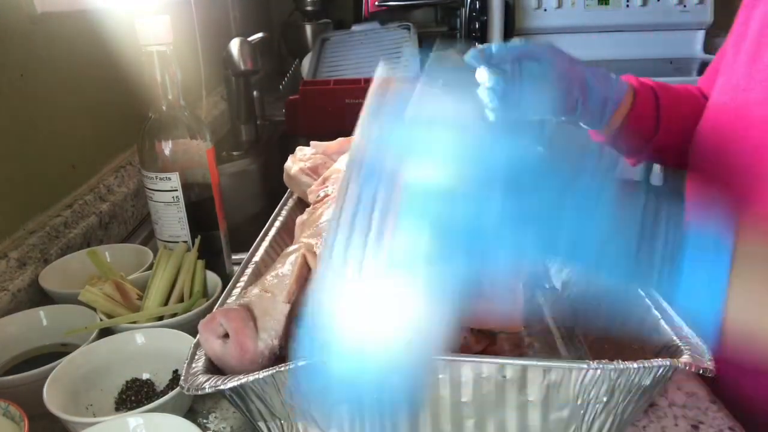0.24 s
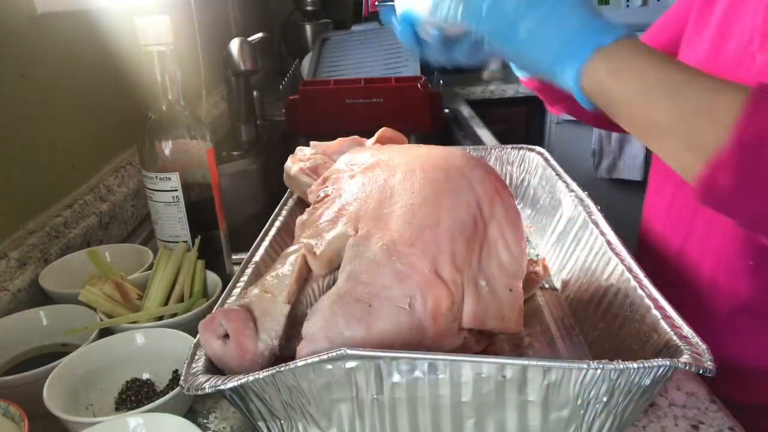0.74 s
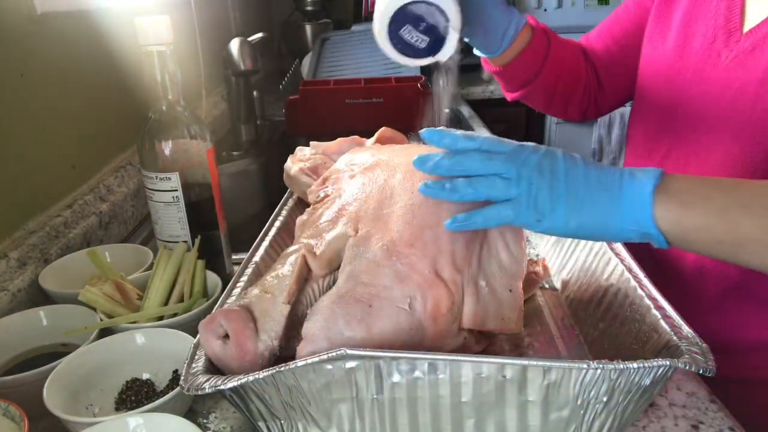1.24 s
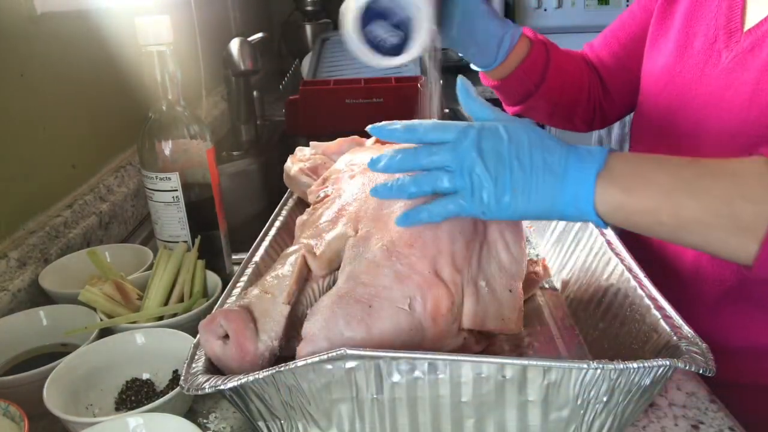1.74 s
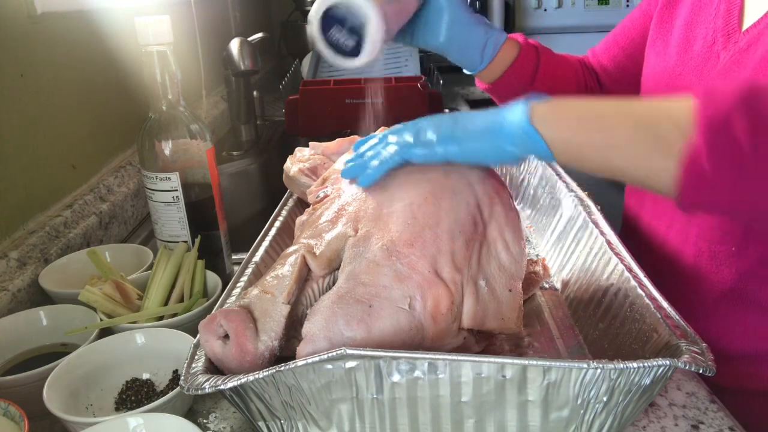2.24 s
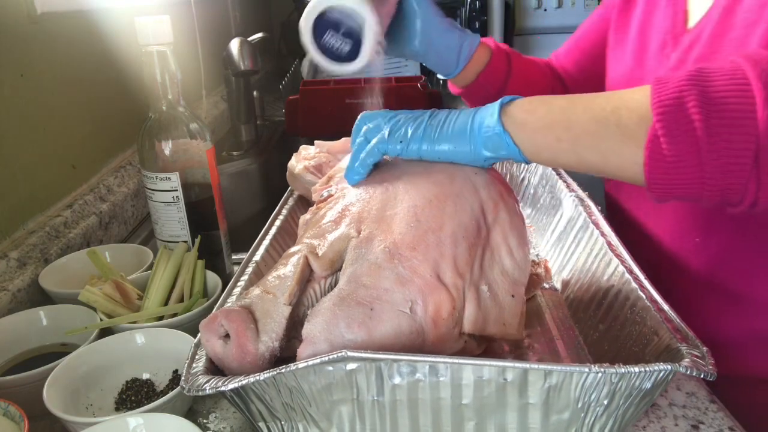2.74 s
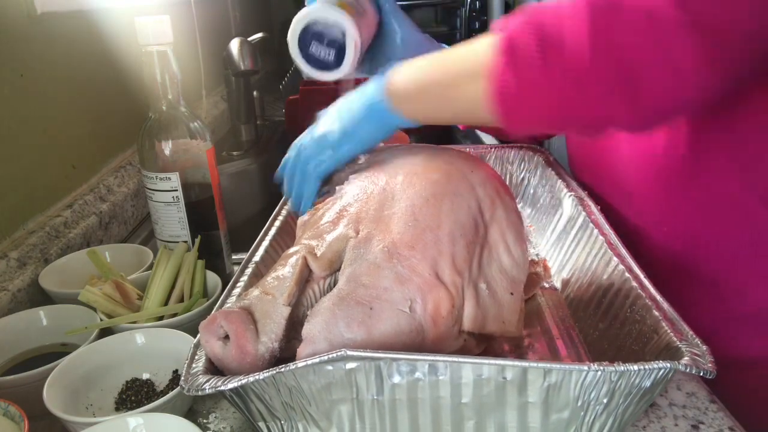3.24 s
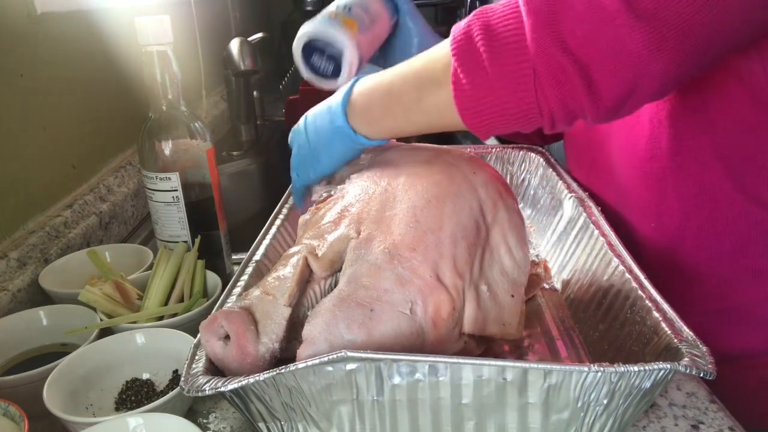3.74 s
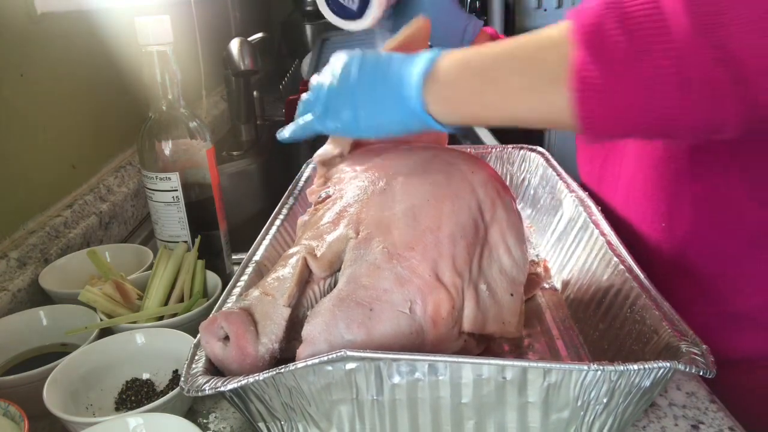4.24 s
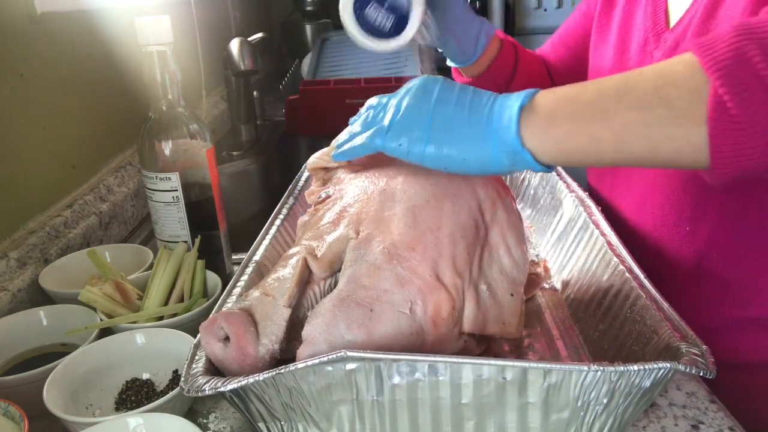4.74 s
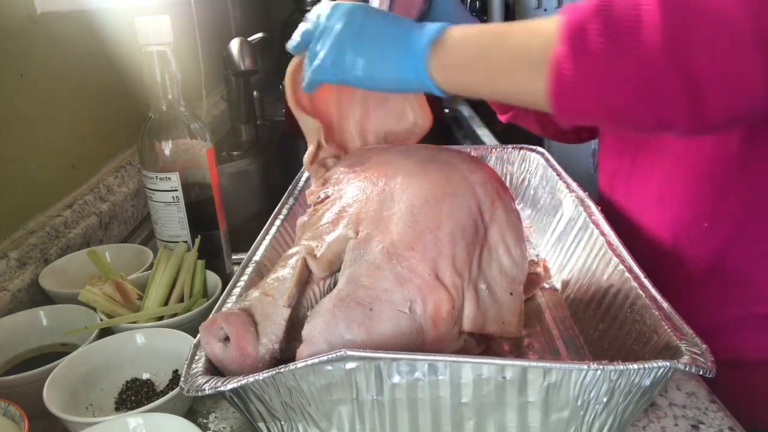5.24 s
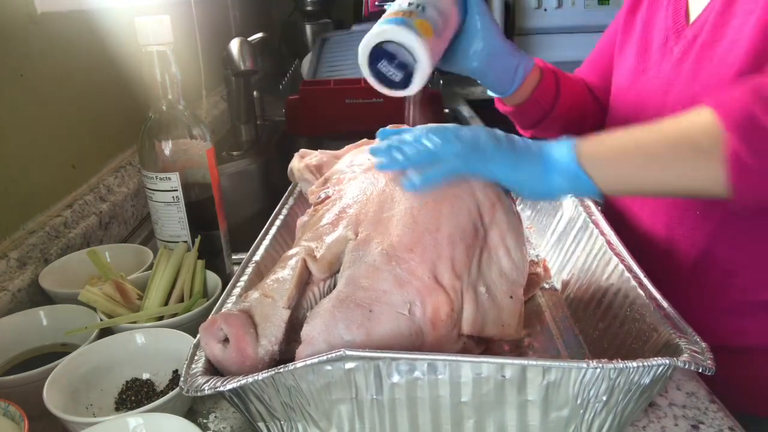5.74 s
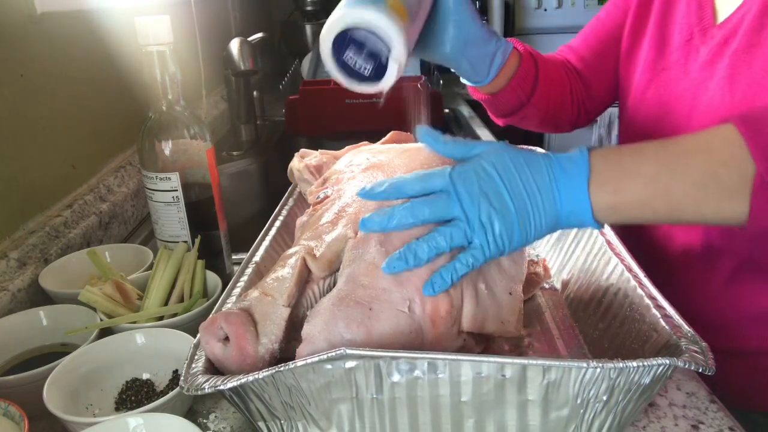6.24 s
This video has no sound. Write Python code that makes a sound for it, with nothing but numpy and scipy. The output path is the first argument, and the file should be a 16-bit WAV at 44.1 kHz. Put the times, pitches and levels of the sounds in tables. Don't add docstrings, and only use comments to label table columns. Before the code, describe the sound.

Close crisp hiss of salt grains ticking on foil and scraping under a rubber glove, broken by hard knocks and a heavy slap.

```python
import sys
import numpy as np
from scipy import signal
from scipy.fft import rfft, irfft
from scipy.io import wavfile
from scipy.ndimage import uniform_filter1d

SR = 44100
rng = np.random.default_rng(int(sys.argv[2]) if len(sys.argv) > 2 else 0)


def generate_wav(signal):
    frames = np.transpose(np.atleast_2d(signal))
    scaled = np.clip(frames, -1, 1) * 32767
    pcm = np.round(scaled).astype(np.int16)
    wavfile.write(sys.argv[1], SR, pcm)


def elevation(decibels):
    levels = np.asarray(decibels, float)
    return 10 ** (levels / 20)


N = 285327

# start [s], peak level [dB], fade t60 [s].
SHOWERS = [(1.314, -17, 0.04), (1.3453, -13, 0.049), (1.446, -15, 0.039), (1.4582, -15, .04),
           (1.592, -17, 0.039), (1.6823, -10, 0.077), (1.7772, -15, .083), (1.8504, -13, 0.061),
           (2.0092, -14, 0.034), (2.0449, -18, 0.049), (2.28, -14, .025), (2.348, -18, 0.052),
           (2.463, -20, .031), (3.326, -22, .032), (3.3914, -21, .04), (3.5405, -19, .04),
           (3.601, -16, 0.031), (4.0167, -24.5, .034), (4.0652, -19, .021), (4.102, -12.5, 0.051),
           (4.2825, -15.5, 0.027), (4.5097, -20, 0.04), (4.551, -20, 0.047), (4.68, -18.5, .035),
           (4.7068, -18, .03), (4.864, -18, 0.033), (4.9637, -20, 0.048), (4.9897, -17, 0.045),
           (5.107, -15, 0.068), (5.3344, -15, .04)]
# start [s], ring level [dB], fade t60 [s], glint [Hz].
LUMPS = [(.8955, -36, .047, 6730), (1.3781, -26, .04, 5700), (1.48, -26.5, 0.035, 3400),
         (1.515, -24.5, 0.058, 3300), (1.64, -31, 0.026, 5530), (1.659, -35, 0.033, 6300),
         (1.7276, -29, 0.043, 5820), (1.8304, -28, 0.057, 3460), (1.9392, -38, .03, 5720),
         (1.9626, -33.5, 0.028, 6080), (2.1713, -29, 0.034, 4340), (2.318, -32, 0.063, 2400),
         (3.3544, -40, .034, 2660), (3.439, -29.5, 0.055, 6060), (3.4655, -33, .043, 6060),
         (3.9228, -36, 0.033, 2700), (3.9606, -34.5, 0.077, 3820), (4.128, -32.5, 0.074, 6870),
         (4.3096, -35, .034, 3900), (4.588, -37, .04, 4570), (4.613, -34, .046, 5170),
         (4.7296, -29, 0.024, 4470), (4.8525, -36.5, 0.043, 4950), (5.066, -30, 0.04, 2710),
         (5.242, -34, .049, 5780), (5.5852, -29, 0.033, 2700), (5.7378, -34, 0.014, 6250),
         (6.0568, -26.5, 0.04, 6440), (6.0843, -25.5, 0.028, 3700), (6.3606, -31, 0.034, 5300)]
# start [s], ring level [dB], glint [Hz].
CREASES = [(0.223, -37, 5850), (.446, -38, 2670), (.4685, -40.5, 4450), (0.714, -32.5, 4360),
           (1.6249, -40, 2430), (1.991, -36, 5570), (2.7883, -36, 4100), (2.878, -35.5, 2600),
           (3.9468, -36, 2000), (4.2367, -31, 6440), (4.247, -29, 3820), (4.795, -32, 2000),
           (4.9028, -30, 5200), (4.925, -37, 3200), (5.014, -31, 2580), (5.3555, -25.5, 5260),
           (5.958, -29, 5700), (5.987, -33, 5700), (6.0413, -28, 4000), (6.135, -41, 2580),
           (6.156, -28.5, 3720), (6.171, -35, 5040), (6.074, -27, 3300), (6.108, -29.5, 3800),
           (6.2378, -33.5, 3770), (6.3317, -23, 3600), (6.385, -35, 3490)]


def unit(x):
    return x / np.sqrt(np.mean(x ** 2))


def on_curve(points, hz):
    f, value = np.transpose(points)
    return np.interp(np.log(np.maximum(hz, 1)), np.log(f), value)


def colour(x, points):
    gain = elevation(on_curve(points, np.fft.rfftfreq(4096, 1 / SR)))
    cepstrum = irfft(np.log(gain))
    cepstrum[1:2048] *= 2
    cepstrum[2049:] = 0
    impulse = irfft(np.exp(rfft(cepstrum)))
    return signal.fftconvolve(x, impulse)[:len(x)]


def resonance(x, hz, width):
    return signal.lfilter(*signal.iirpeak(hz, hz / width, fs=SR), x)


def resonance_twice(x, hz, width):
    return resonance(resonance(x, hz, width), hz, width)


def die_away(t, t60):
    return np.exp(-np.log(1000) * t / t60)


def walk(rate):
    hold = int(SR / rate)
    steps = np.repeat(rng.standard_normal(N // hold + 1), hold)
    smooth = uniform_filter1d(uniform_filter1d(steps, hold), hold)
    return unit(smooth[:N])


def swells(steady_db, rows):
    t = np.arange(N) / SR
    power = elevation(2 * steady_db)
    for peak, half, db in rows:
        power = power + elevation(2 * db) * np.exp(-((t - peak) / half) ** 2)
    return np.sqrt(power)


def knocks():
    # start [s], ring level [dB], rattle level [dB], rattle decay stretch [x], rise [s].
    blows = [
        (.0, -17.5, -24, 1., 0.00073),
        (0.492, -40, -39.5, 0.25, 0.00043),
        (2.5403, -11.5, -22, 0.98, 0.0018),
        (5.4775, -10.5, -16, 0.78, 0.0089),
    ]
    # frequency [Hz], level [dB], t60 [s].
    blow_modes = [
        [(64.6, -9, 0.14), (357, -5.5, 0.16), (508, -8.5, 0.25), (637, 2.5, 0.26), (1100, -20, 0.27),
         (1430, -33, 0.68)],
        [(200, -2, .05), (450, 0, 0.045), (980, 6, .045), (2700, 2, .04)],
        [(115, -8.5, 0.12), (204, -6, 0.17), (338, -8.5, 0.24), (408, -1, 0.066), (456, -5.5, 0.17),
         (1083, -8.5, 0.14), (1275, -13, .15), (1463, 6, 0.041), (1415, -19, .3), (1810, -25, 0.22),
         (2000, -10, 0.091), (2320, -9.5, 0.1), (3010, -12, 0.082), (4140, -15, 0.057), (6600, -15, .05)],
        [(92, -10, 0.21), (163, 0, 0.23), (215.3, -5, 0.2), (330.7, 1.5, 0.22), (389, 6.5, 0.12),
         (419, -6, 0.25), (1008, 1, 0.054), (688, 9.5, 0.052), (798, -4.5, 0.18), (903, -11, 0.13),
         (1300, -12, 0.14), (1470, -4, 0.05), (1793, 2.5, 0.067), (2000, 1, 0.039), (2700, -11.5, .07)],
    ]
    # frequency [Hz], level [dB per Hz].
    rattle_spectra = [
        [(35, -41), (60, 0), (236, -8), (642, -4), (857, -18), (1240, -9), (1820, -26), (6000, -38),
         (7800, -77), (13200, -120)],
        [(90, -25), (200, 4), (1020, -5.5), (2080, -16), (2780, -10), (5010, -17), (8000, -7), (10400, -41),
         (17600, -120)],
        [(35, -35), (60, 2), (364, 0), (860, -16.5), (1390, -1.5), (1720, -7.5), (2070, -7), (3970, -15.5),
         (5560, -15.5), (9000, -64), (11700, -72), (19800, -120)],
        [(29, -41), (50, 8), (385, 6), (546, -1), (1020, -3.5), (1450, 0.5), (2050, -17), (3610, -9),
         (5010, -30), (9000, -61), (11700, -63), (19800, -120)],
    ]
    # frequency [Hz], t60 [s].
    rattle_t60 = [(60, 0.34), (300, 0.27), (900, 0.37), (2000, 0.23), (4000, 0.087), (9000, 0.032)]
    out = np.zeros(N + SR)
    t = np.arange(SR // 2) / SR
    for blow, modes, spectrum in zip(blows, blow_modes, rattle_spectra):
        start, ring_db, rattle_db, stretch, rise = blow
        ring = 0
        for hz, db, t60 in modes:
            ring = ring + elevation(db) * np.sin(2 * np.pi * hz * t) * die_away(t, min(t60, .45))
        rattle = 0
        for hz in 80 * 2 ** np.arange(0, 7, .5):
            band = unit(resonance_twice(rng.standard_normal(len(t)), hz, hz / 1.85))
            crack = 1.19 * np.exp(-t / 0.01)
            fade = die_away(t, stretch * on_curve(rattle_t60, hz)) + crack
            onset = np.minimum((t + .0001) * hz / 3.4, 1)
            rattle = rattle + elevation(on_curve(spectrum, hz)) * np.sqrt(hz / 300) * band * fade * onset
        landing = np.minimum(t / rise, 1) ** 2
        i = int(start * SR)
        out[i:i + len(t)] += (elevation(ring_db) * ring + elevation(rattle_db - 6.5) * rattle) * landing
    return out[:N]


def kitchen():
    # frequency [Hz], level [dB per Hz].
    air_spectrum = [(15, -11), (25, -0.5), (145, -6), (335, -10.5), (451, -16), (575, -14), (818, -22.5),
                    (911, -21), (1230, -20.5), (1740, -23), (2050, -25.5), (4250, -29.5), (16000, -34)]
    # steady level [dB], then swells, each with peak [s], half length [s], level [dB].
    rumble_levels = (-54, [(0.01, 0.5, -32.5), (2.72, 0.17, -38), (3.5, 0.074, -39), (4.1, 0.34, -42)])
    # tone [Hz], steady level [dB], swells, each with peak [s], half length [s], level [dB].
    appliance_tones = [
        (52.3, -60, [(.6, 1, -48), (2.62, 0.26, -42)]),
        (90.7, -63.5, [(.45, 0.27, -48), (3.1, 1.6, -52.5)]),
        (141.5, -68, [(.35, 0.34, -41), (2.1, 0.28, -50.5), (3.9, 0.72, -51), (5.64, 0.33, -53.5)]),
        (168.6, -59, [(5.2, .5, -54.5)]),
        (196.6, -55, [(5.64, 0.29, -56.5)]),
        (272, -73, [(.1, 0.37, -55), (2.05, 0.2, -54), (4.1, .5, -64.5)]),
    ]
    air_db = -46 + .8 * walk(6)
    air = elevation(air_db) * unit(colour(rng.standard_normal(N), air_spectrum))
    low_noise = unit(resonance_twice(rng.standard_normal(N), 57, 90))
    rumble = swells(*rumble_levels) * elevation(-10.0 + 2.3 * walk(4.58)) * low_noise
    hum = 0
    for hz, steady_db, rows in appliance_tones:
        wavering_hz = hz * (1 + 0.006 * walk(8))
        phase = 2 * np.pi * np.cumsum(wavering_hz) / SR
        hum = hum + swells(steady_db, rows) * elevation(2.5 + 2.2 * walk(11)) * np.sin(phase)
    return air + rumble + hum


def bursts():
    # start [s], bright level [dB], ring level [dB], t60 [s], glint [Hz].
    clatter = (0.001, -26, -38, .075, 1500)
    # start [s], bright level [dB], ring level [dB], t60 [s], glint [Hz].
    buckle = (5.4836, -31, -18, .026, 1940)
    rows = [clatter, buckle]
    for start, db, t60 in SHOWERS:
        patch_hz = rng.uniform(2530, 6960)
        rows.append((start, db, db - 18.5, t60, patch_hz))
    for start, db, t60, hz in LUMPS:
        rows.append((start, db + 13.5, db, t60, hz))
    for start, db, hz in CREASES:
        rows.append((start, db + 9, db, 0.034, hz))
    return rows


def showers():
    power, glint = np.zeros((3, N)), np.zeros(N)
    for start, bright_db, ring_db, t60, hz in bursts():
        i = int(start * SR)
        t = np.arange(min(N - i, SR // 5)) / SR
        rise = 0.0011 * (t60 / 0.044) ** 2
        shape = np.minimum(t / rise, 1) * die_away(np.maximum(t - rise, 0), t60)
        layer_db = np.array([[bright_db - 13.0], [ring_db - 3.0], [ring_db - 20]])
        power[:, i:i + len(t)] += (elevation(layer_db) * shape) ** 2
        tone = np.sin(2 * np.pi * (hz * t + rng.random()))
        glint[i:i + len(t)] += elevation(ring_db - 2.5) * shape ** 1.23 * tone
    return power, glint


def puffs(rows, sharpness, trim_db, rise_s):
    out, t = np.zeros(N + SR), np.arange(SR // 10) / SR
    for start, db, hz, t60 in rows:
        i = int(start * SR)
        puff = unit(resonance(rng.standard_normal(len(t)), hz, hz / sharpness))
        shape = np.minimum(t / rise_s, 1) * die_away(t, t60)
        out[i:i + len(t)] += elevation(db + trim_db) * puff * shape
    return out[:N]


def coarse_grains():
    # start [s], peak level [dB], centre [Hz], t60 [s].
    landing = [(0.1134, -38, 5330, 0.015), (0.2014, -27, 6690, 0.015), (0.2239, -20.5, 5680, 0.015),
               (0.6784, -27, 6170, 0.015), (0.7384, -34, 11160, 0.015), (1.3139, -23, 12500, 0.015),
               (1.3458, -18, 13500, 0.012), (1.4134, -21, 6170, 0.015), (1.4254, -21, 12800, 0.015),
               (1.4654, -13, 14000, 0.015), (1.4854, -16, 7130, 0.015), (1.5044, -21, 8040, 0.015),
               (1.515, -15, 9550, 0.015), (1.9054, -29, 7420, 0.015), (1.9395, -22, 12800, 0.015),
               (1.9624, -22, 13900, 0.015), (1.9704, -20, 6300, 0.015), (2.0044, -22, 13400, 0.015),
               (2.0083, -23, 13000, 0.015), (2.0534, -16, 11500, 0.015), (2.0694, -23, 11400, 0.015),
               (2.8964, -29, 13600, 0.015), (4.0554, -25, 4340, 0.015), (4.0647, -23, 11500, 0.015),
               (4.1021, -20, 11300, 0.015), (4.1354, -23, 5370, 0.015), (4.2098, -20, 6200, 0.017),
               (4.2817, -15, 12400, 0.015), (4.3091, -20, 3900, 0.015), (4.3264, -21, 11600, 0.015),
               (4.3444, -21, 12400, 0.015), (4.372, -25, 12000, 0.015), (4.6798, -18, 13000, 0.015),
               (4.7296, -14.5, 11900, 0.016), (5.9579, -17, 5700, 0.015), (5.9964, -20, 4340, 0.015),
               (6.0064, -23, 13100, 0.015), (6.1564, -19, 11600, 0.014), (6.2377, -29, 3700, 0.015),
               (6.2821, -26, 11900, 0.015), (6.332, -23, 4080, 0.015), (6.3534, -19, 5380, 0.017)]
    # start [s], peak level [dB], centre [Hz], t60 [s].
    bouncing = [(0.7138, -26, 4360, 0.018), (2.0448, -22, 11500, 0.018), (4.808, -24, 11400, 0.018),
                (4.864, -23, 13300, 0.018), (4.8774, -33, 13300, 0.018), (4.8927, -24, 5460, 0.018),
                (4.9252, -23, 13500, 0.018), (4.9382, -26, 11600, 0.018), (4.9494, -26, 11000, 0.018),
                (5.1324, -20, 12300, 0.014), (5.5654, -15, 11400, 0.018), (5.6254, -23, 3750, 0.018)]
    return puffs(landing + bouncing, 1.2, -10, 0.00022)


def gesture(full, swell, hold, db, sag_db_per_s):
    t = np.arange(N) / SR - full
    swell_db = -11.5 * (-t / swell).clip(0)
    sag_db = -sag_db_per_s * t.clip(0)
    release_db = -356 * ((t - hold).clip(0) + (-swell - t).clip(0))
    return elevation(2 * (db + swell_db + sag_db + release_db))


def hands():
    # full pressure at [s], swell [s], hold [s], level [dB].
    strokes = [(0.19, 0.16, 0.041, -53), (0.452, .007, .043, -46.5), (0.585, .025, 0.011, -43),
               (0.678, 0.065, 0.047, -43.5), (1.098, .075, .005, -50), (1.13, .03, 0.1, -50),
               (1.326, 0.0064, 0.11, -39), (1.588, 0.32, 0.28, -41), (1.926, 0.071, .02, -44),
               (2.184, 0.26, 0.34, -39), (2.65, 0.19, 0.45, -51.5), (2.992, 0.079, .01, -46.5),
               (3.42, 0.048, 0.11, -44), (3.603, 0.27, 0.24, -42), (4.05, 0.37, .01, -51),
               (4.077, 0.0072, 0.24, -42), (4.54, 0.61, 0.089, -43), (4.68, 0.015, 0.12, -43.5),
               (4.9, 0.095, .05, -49), (4.97, .012, 0.19, -39.5), (5.106, 0.22, 0.21, -40.5),
               (5.37, 0.32, 0.47, -35.5), (6.05, 0.93, 0.14, -44.5), (6.22, .05, 0.28, -52.5)]
    # full flow at [s], swell [s], hold [s], level [dB], lumpiness [0 to 1].
    pours = [(0.21, 0.063, 0.17, -49.5, 0.29), (0.469, 0.021, 0.013, -38, 0.69),
             (0.864, 0.3, .02, -38.5, 0.12), (0.922, 0.054, 0.077, -27.5, 0.051),
             (1.053, 0.1, 0.028, -26, .12), (1.11, 0.047, .11, -35, 0.29), (1.32, .004, 0.17, -34.5, 0.29),
             (1.503, .16, 0.042, -36, 0.51), (1.84, 0.6, 0.048, -34, 0.57), (1.94, .01, 0.44, -37.5, 0.36),
             (2.33, .34, 0.14, -38.5, 0.34), (3.001, 0.03, 0.013, -44, 0.63), (3.34, 0.27, .02, -52, 0.53),
             (3.396, 0.059, 0.14, -36.5, .35), (3.588, .19, 0.26, -35.5, 0.44),
             (4.055, .25, .02, -50, 0.47), (4.1, 0.027, 0.24, -38.5, 0.53),
             (4.435, 0.51, 0.24, -38.5, 0.35), (4.69, .015, 0.13, -42, 0.31),
             (4.962, 0.12, 0.12, -38, 0.31), (5.118, .18, 0.25, -46, 0.27),
             (5.324, 0.39, 0.51, -29.5, 0.49), (6.05, 0.27, 0.089, -35, 0.52),
             (6.332, 0.18, 0.17, -41, 0.54)]
    tipped_s, tip_db_per_s = 0.68, 30
    before_tip = (tipped_s - np.arange(N) / SR).clip(0)
    trickle = elevation(2 * (-52 - tip_db_per_s * before_tip))
    bright, ring, lumps = trickle, trickle, 0.28 * trickle
    for full, swell, hold, db, lumpy in pours:
        power = gesture(full, swell, hold, db, 20.5)
        bright = bright + power
        lumps = lumps + power * lumpy
        ring = ring + power * elevation(2 * (-11.5 + 18 * lumpy))
    rub = elevation(2 * -59)
    for full, swell, hold, db in strokes:
        rub = rub + gesture(full, swell, hold, db, 19.5)
    ring = ring + rub * elevation(2 * -2.5)
    return (bright, ring, rub), (lumps / bright).clip(0, 1)


def lulls():
    # end [s], length [s], level change [dB].
    pauses = [(0.167, .12, -3), (1.32, 0.079, -8.5), (1.341, 0.013, -6), (1.445, .012, -4),
              (1.624, 0.022, -5), (1.656, 0.0088, -5), (1.71, .012, -5.5), (1.774, 0.028, -3.5),
              (1.937, 0.013, -4), (1.963, .012, -8), (2.46, 0.032, -3.5), (3.118, 0.091, -4),
              (3.352, .016, -4.5), (3.43, 0.018, -4), (4.06, 0.018, -9), (4.281, 0.022, -3),
              (4.5, 0.022, -6), (4.587, .01, -8), (4.68, .035, -3), (4.698, .008, -6), (4.757, .015, -6),
              (5.955, 0.0094, -4), (6.247, .04, -5.5), (6.278, 0.036, -3)]
    depth, length_s = 0.22, 0.026
    gain = np.ones(N)
    to_burst = np.arange(SR // 20)[::-1] / SR
    for start, *_ in SHOWERS + LUMPS + CREASES:
        i = int(start * SR)
        gain[i - len(to_burst):i] *= 1 - depth * np.exp(-to_burst / length_s)
    for end, length, db in pauses:
        first, last = int((end - length) * SR), int(end * SR)
        ramp = np.minimum(np.linspace(0, 3, last - first), 1)
        gain[first:last] *= elevation(2 * db * ramp)
    return gain


def grains(per_s, spread_db):
    hit = rng.random(N) < per_s / SR
    size = elevation(spread_db * rng.exponential(size=N))
    return unit(hit * rng.standard_normal(N) * size)


def spurts(per_s, spread_db, fade_s):
    tail = np.exp(-np.arange(int(8 * fade_s * SR)) / (fade_s * SR))
    power = signal.fftconvolve(grains(per_s, spread_db) ** 2, tail)[:N].clip(0)
    return 8.0 * np.tanh(power / power.mean() / 3.1)


def salt():
    # frequency [Hz], level [dB per Hz].
    bright_spectrum = [(5000, -20), (8000, -3.5), (9300, -1), (10300, -4), (11100, 1), (12600, 2.5),
                       (14600, -3.5), (16500, -9.5)]
    # frequency [Hz], level [dB per Hz].
    ring_spectrum = [(1500, -19), (2600, -5), (3400, 0), (4900, -2), (5700, -2.5), (8000, -0.5),
                     (14000, -18)]
    # frequency [Hz], level [dB per Hz].
    rub_spectrum = [(250, -31.5), (450, -20), (850, -14), (1300, -3), (2200, -1), (2600, -1.5),
                    (3200, -3.5), (7000, -22)]
    # frequency [Hz], width [Hz], level [dB].
    foil_modes = [(1510, 50, -23), (2580, 170, -1.5), (3420, 31, -19), (4360, 160, -2), (5700, 960, 3.5),
                  (6680, 860, 2), (9640, 680, -8)]
    patter = grains(14000, 1.3) + .9 * rng.standard_normal(N)
    foil = unit(sum(elevation(db) * resonance(patter, hz, width) for hz, width, db in foil_modes))
    struck = patter + elevation(-6.5) * foil
    gush = spurts(110, 1.5, .004)
    drives, lumpy = hands()
    flow_db = 1.73 * lumpy * walk(30)
    burst_power, out = showers()
    thinning = lulls()
    spectra = bright_spectrum, ring_spectrum, rub_spectrum
    gush_shares = .45, .45, .35
    for spectrum, drive, burst, share in zip(spectra, drives, burst_power, gush_shares):
        level_db = -1.0 + flow_db + 0.97 * walk(40)
        gushing = 1 + share * lumpy * (gush - 1)
        bed = drive * elevation(2 * level_db) * gushing * thinning
        out = out + unit(colour(struck, spectrum)) * np.sqrt(np.abs(bed) + burst)
    return out


def squeak():
    # centre [Hz], width [Hz], level [dB].
    chirp_band = (1360, 190, -41)
    hz, width, db = chirp_band
    peak_s, half_s = 1.058, .024
    swell = np.exp(-((np.arange(N) / SR - peak_s) / half_s) ** 2)
    return elevation(db) * swell * unit(resonance(rng.standard_normal(N), hz, width))


def spatters():
    # start [s], peak level [dB], centre [Hz], t60 [s].
    handfuls = [(1.568, -23.5, 8970, 0.04), (1.5764, -19.5, 4380, 0.04), (1.676, -18, 9490, 0.04),
                (1.712, -20, 12800, 0.04), (1.7474, -25, 5550, 0.04), (1.7904, -18, 11700, 0.04),
                (1.8044, -20, 13000, 0.04), (1.8164, -17, 7110, 0.04), (2.1101, -26, 11700, 0.04),
                (2.1424, -19, 12400, 0.04), (2.1834, -17, 12900, 0.04), (2.2114, -25, 13400, 0.04),
                (2.2454, -27, 13900, 0.04), (2.2944, -22, 13000, 0.04), (2.4104, -24, 13800, 0.04),
                (3.3024, -26, 11100, 0.04), (3.3684, -22, 11800, 0.04), (3.4324, -20, 6100, 0.04),
                (3.4894, -22, 12800, 0.04), (3.5194, -19, 12800, 0.04), (3.5594, -22, 11800, 0.04),
                (3.5794, -20, 11900, 0.04), (3.6436, -29, 12800, 0.04), (3.6674, -26, 12500, 0.04),
                (4.3184, -23, 12200, 0.04), (4.3939, -19, 13100, 0.04), (4.4294, -22, 13200, 0.04),
                (4.4574, -30, 12100, 0.04), (4.5048, -19, 12400, 0.04), (4.6344, -25, 11800, 0.04),
                (4.6984, -23, 13000, 0.04), (4.7774, -21, 12100, 0.04)]
    return puffs(handfuls, 1.1, -10, .002)


def pan_settling():
    # start [s], peak level [dB], centre [Hz], t60 [s].
    nudges = [
        (3, -38, 1350, .07),
        (2.885, -40.5, 1350, .07),
        (3.4, -45, 2700, .06),
        (5.576, -27, 420, .06),
        (5.508, -17, 380, 0.05),
    ]
    return puffs(nudges, 3.5, -4, .003)


def scene():
    grit = coarse_grains() + spatters() + pan_settling()
    return (knocks() + kitchen() + salt() + squeak() + grit)[None]


def roll_off(x):
    return signal.sosfilt(signal.butter(12, 16470, fs=SR, output="sos"), x)


def record(dry):
    bass_cut = signal.butter(2, 38, "high", fs=SR, output="sos")
    top_cut = signal.ellip(10, .3, 42, 15850, fs=SR, output="sos")
    x = np.clip(signal.sosfilt(bass_cut, dry), -1, 1)
    return roll_off(signal.sosfilt(top_cut, x))


dry = scene()
out = record(dry)
generate_wav(out)
```